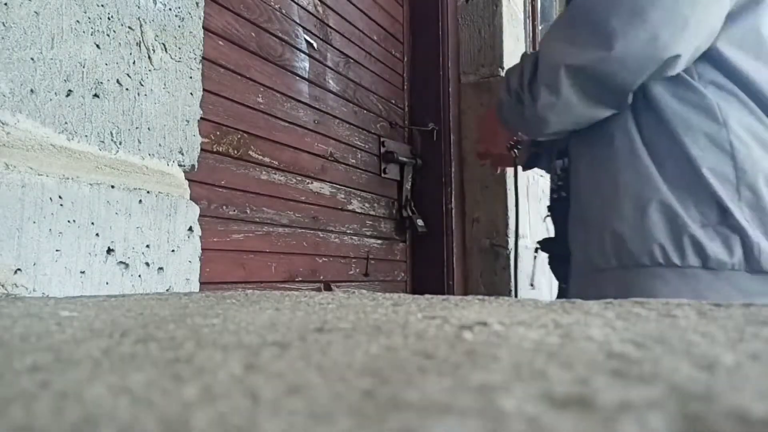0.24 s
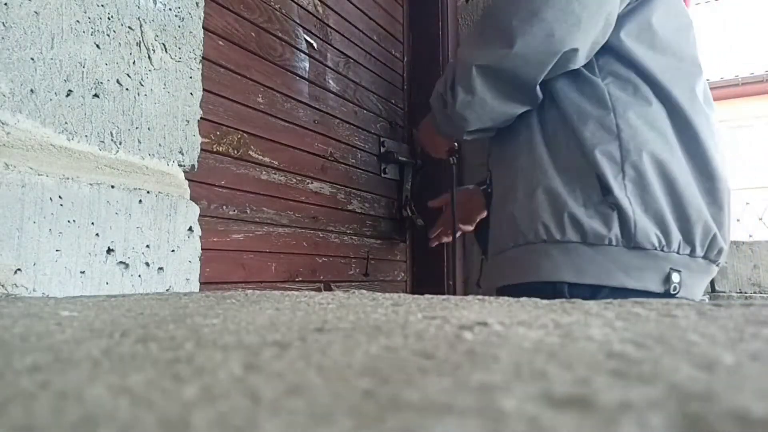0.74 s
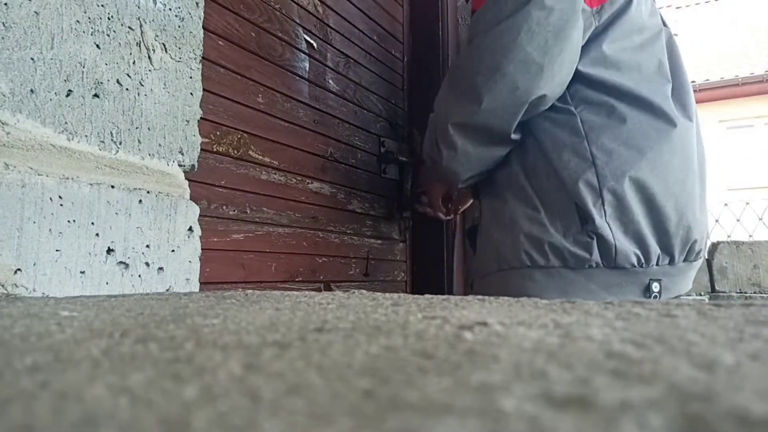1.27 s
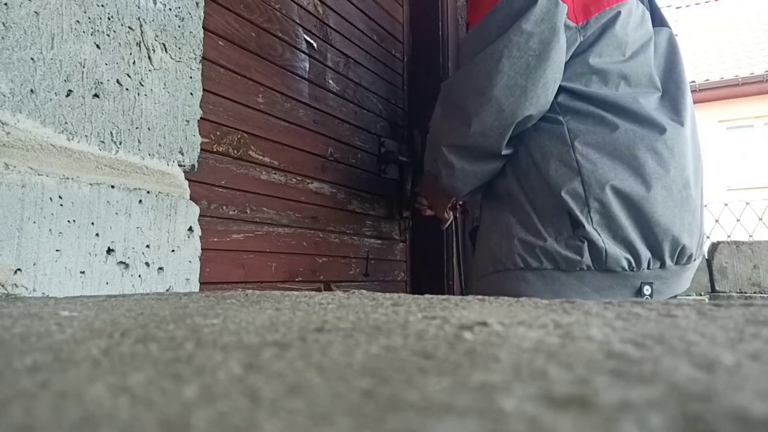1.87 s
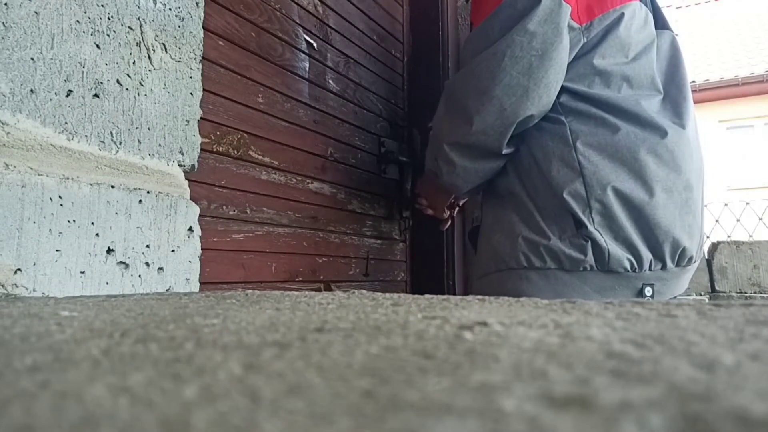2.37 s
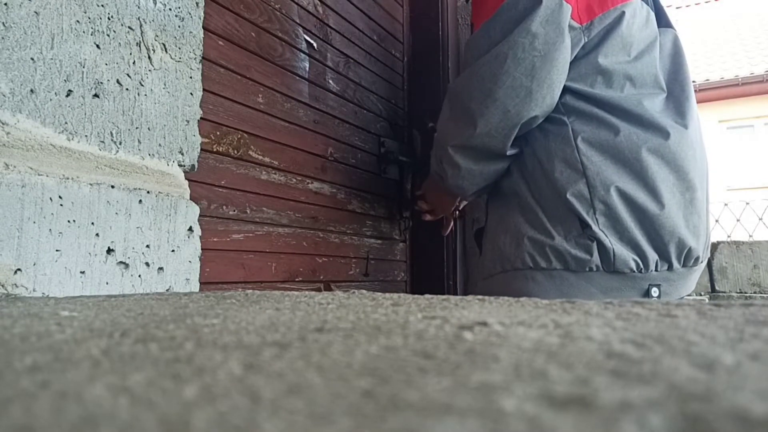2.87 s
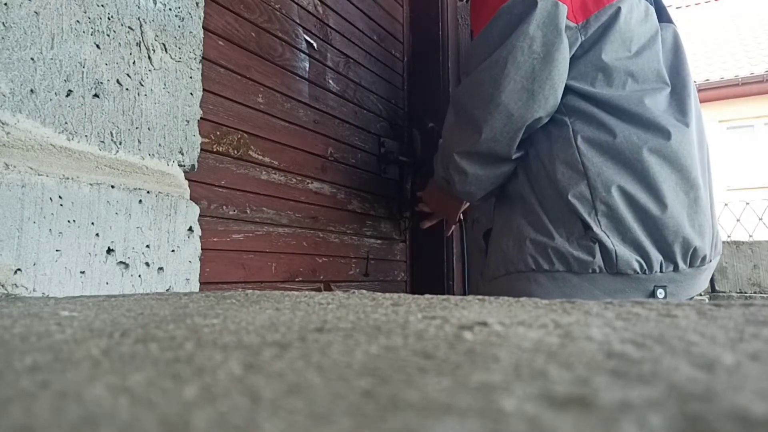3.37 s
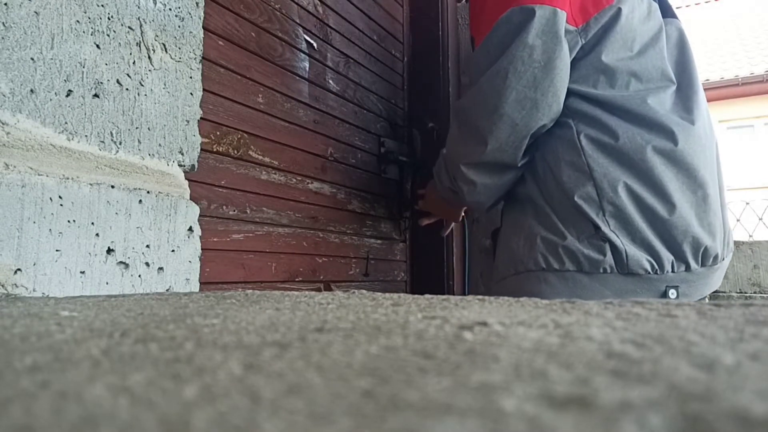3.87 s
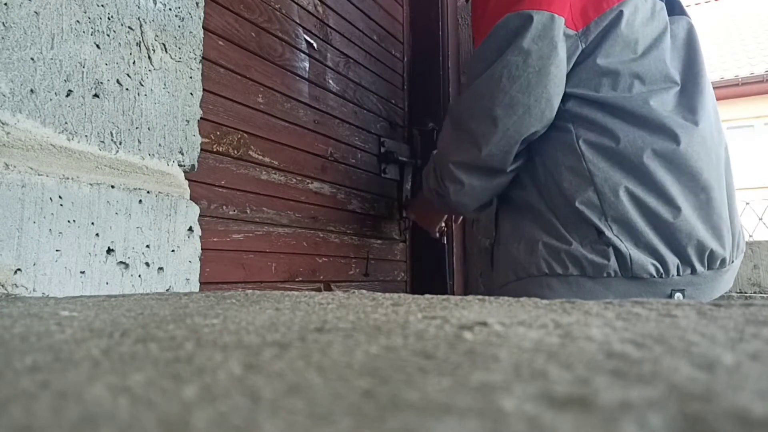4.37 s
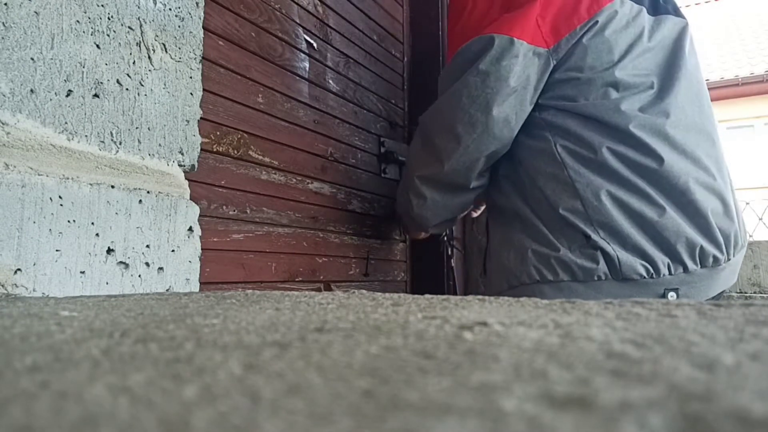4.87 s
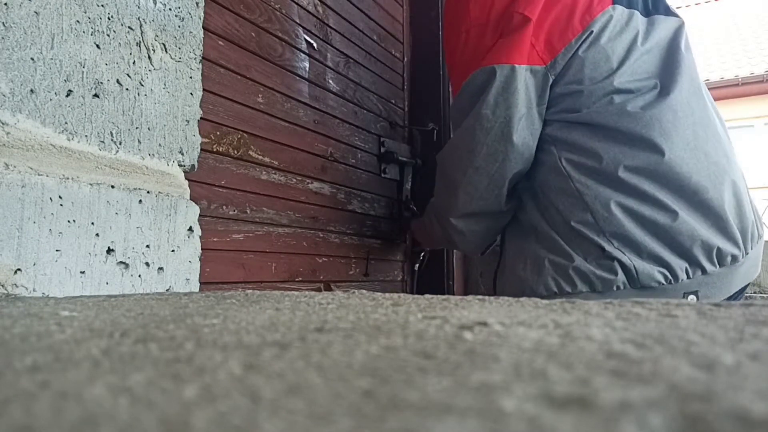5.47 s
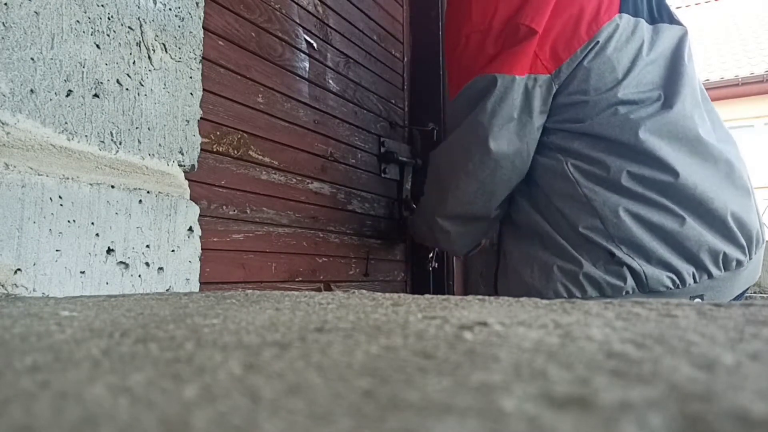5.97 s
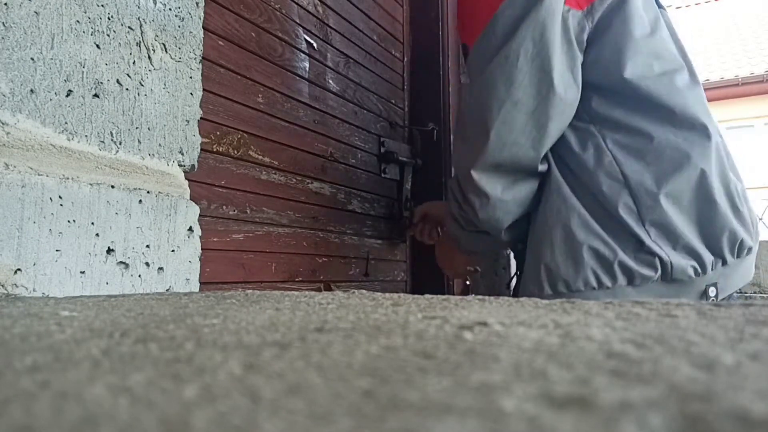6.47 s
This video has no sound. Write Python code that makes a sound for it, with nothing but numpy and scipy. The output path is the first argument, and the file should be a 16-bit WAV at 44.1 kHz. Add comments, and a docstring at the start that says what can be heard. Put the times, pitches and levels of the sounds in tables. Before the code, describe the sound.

An iron latch and chain on an old plank door clank, tick and jingle by hand while small birds chirp outdoors.

```python
"""Outdoors in quiet air, a jacket rustles as small birds chirp and shoes scuff: shaped noise and gliding tones.
Then someone works the iron latch and chain of an old plank door. Struck iron and boards ring as decaying modes,
chain links tick and jingle as short noise bursts and pure notes, and the latch drags by stick-slip friction.
Faint far whistles and hums enter later. Sparse decaying taps give the short echo of the walls and ground."""
import sys
import numpy as np
from scipy import signal
from scipy.fft import rfft, irfft, next_fast_len
from scipy.io import wavfile
from scipy.ndimage import uniform_filter1d

SR = 44100
rng = np.random.default_rng(int(sys.argv[2]) if len(sys.argv) > 2 else 0)


def materialize(psi):
    """Save the field psi as 16-bit PCM at rate SR to the path in sys.argv[1].

    A 1-D psi becomes a single channel; in a 2-D psi each row is a channel.
    """
    bounded = np.clip(np.atleast_2d(psi).T, -1, 1)
    quanta = np.round(bounded * 32767).astype(np.int16)
    wavfile.write(sys.argv[1], SR, quanta)


N = 297234
TIME = np.arange(N) / SR  # the whole scene [s]
AFTER = np.arange(SR * 3 // 4) / SR  # time since one event began [s]


def amp(db):
    """Level law: decibels to amplitude gain."""
    return 10 ** (np.asarray(db) / 20)


def unit(x):
    """Power normalisation: scales to rms 1."""
    return x / np.sqrt(np.mean(x ** 2) + 1e-20)


def unit_peak(x, size=220):
    """Short-time normalisation: the loudest 5 ms get rms 1."""
    return x / np.sqrt(uniform_filter1d(x ** 2, size).max() + 1e-20)


def read(points, hz):
    """Interpolation of a table along a logarithmic frequency axis."""
    f, value = np.transpose(points)
    return np.interp(np.log(hz + 1), np.log(f + 1), value)


def level(rows):
    """Level contour: interpolates (time, dB) rows into a gain for every sample."""
    return amp(np.interp(TIME, *np.transpose(rows)))


def colour(x, spectrum):
    """Spectral shaping: weights the Fourier components by a table, at rms 1."""
    size = next_fast_len(len(x))
    gain = amp(read(spectrum, np.fft.rfftfreq(size, 1 / SR)))
    return unit(irfft(rfft(x, size) * gain, size)[:len(x)])


def band(x, hz, kind, order=3):
    """Causal Butterworth filtering: low-, band- or high-pass."""
    return signal.sosfilt(signal.butter(order, hz, kind, fs=SR, output="sos"), x)


def add(mix, s, sound):
    """Superposition: adds a sound into the mix at time s [s]."""
    part = mix[max(round(s * SR), 0):][:len(sound)]
    part += sound[:len(part)]


def stroke(s, length, attack_s, release_s):
    """Envelope of one movement: linear attack, hold, exponential release."""
    attack = np.clip((TIME - s) / attack_s, 0, 1)
    return attack * np.exp(-np.clip((TIME - s - length) / release_s, 0, 20))


def grains(per_s, spread_db):
    """Granular friction: sparse random impulses, tiny slips of uneven size."""
    size = amp(spread_db * np.minimum(rng.exponential(1, N), 4))
    return unit(rng.standard_normal(N) * size * (rng.random(N) < per_s / SR))


def wobble(size):
    """Smoothed random modulation: a quick waver of rms 1."""
    return unit(uniform_filter1d(rng.standard_normal(len(AFTER)), size=size))


def resonate(x, hz, width):
    """Single resonance of gain 1: shifts hz to zero, smooths with one pole, shifts back."""
    turn = np.exp(2j * np.pi * np.cumsum(hz * np.ones(len(x))) / SR)
    r = np.exp(-np.pi * width / SR)
    return 2 * (turn * signal.lfilter([1 - r], [1, -r], x / turn + 1e-18)).real


def chatter(db, fade_s=0.013, per_s=350):
    """Contact bounce: one unit impulse, then random rebounds that die away exponentially."""
    t = AFTER[:SR // 20]
    hits = rng.standard_normal(len(t)) * (rng.random(len(t)) < per_s / SR)
    rebounds = hits * np.exp(-t / fade_s) * (t > .002)
    return amp(db) * rebounds / (np.linalg.norm(rebounds) + 1e-9) + (t == 0)


# spectrum of the quiet outdoor air: (frequency [Hz], relative density [dB per Hz])
AIR_SPECTRUM = [(15, -48), (25, -1.5), (79, 14.5), (274, -5.5), (389, 3), (895, -1.5), (1200, -5),
                (1660, -1.5), (2230, -22), (6550, -38.5), (8130, -31.5), (11200, -31.5), (15500, -48)]


def air(rms_db=-73):
    """Stationary background: steady Gaussian noise with a fixed spectrum."""
    return amp(rms_db) * colour(rng.standard_normal(N), AIR_SPECTRUM)


# how busily the arms move, heard as jacket swish: (time [s], relative level [dB])
ARM_MOTION = [(0, -56.5), (.24, -57), (.52, -69.5), (.76, -52.5), (.92, -63.5), (1.33, -50.5), (1.56, -72),
              (2.42, -72), (2.6, -66.5), (3.37, -70.5), (3.42, -78), (3.88, -70.5), (4.13, -56),
              (4.82, -48), (5.38, -61), (5.72, -63.5), (6.3, -56), (6.62, -62)]
# hand and cuff brushing the boards: (time [s], length [s], relative rub level [dB], relative swish level [dB])
BOARD_BRUSHES = [(.1, 0.056, -49, -56), (1.14, 0.057, -44.5, -60), (2.62, 0.1, -52.5, -68),
                 (2.85, 0.24, -51, -62), (3.29, 0.069, -50.5, -63.5), (3.65, 0.056, -38, -53),
                 (4.84, 0.048, -45, -60), (4.98, 0.16, -40, -46.5), (5.66, 0.13, -44, -53),
                 (6.0, 0.074, -43, -64), (6.2, 0.14, -63, -52.5)]
BRUSH_ATTACK_S, BRUSH_RELEASE_S = 0.018, 0.039
# one sweep of the sleeve
SWEEP_AT_S, SWEEP_S, SWEEP_DB, SWEEP_ATTACK_S, SWEEP_RELEASE_S = 2.46, 0.1, -46.5, .04, 0.063
# spectra of jacket cloth, of dull rubbing and of the sleeve: (frequency [Hz], relative density [dB per Hz])
CLOTH_SPECTRUM = [(800, 6.5), (2000, -3.5), (3500, 0), (5500, -2.5), (7900, 2), (9500, -6), (11500, -15.5),
                  (14000, -3.5), (15800, 2)]
RUB_SPECTRUM = [(18, -46.5), (30, -17), (59, 10), (114, -1.5), (147, 3.5), (271, -0.5), (321, 4.5),
                (372, -10.5), (509, -2), (579, -9), (697, -4), (1170, -15), (2500, -30), (3250, -53),
                (5500, -120)]
SLEEVE_SPECTRUM = [(60, 3.5), (200, 7.5), (400, 3), (1500, -10), (3000, -3.5), (4600, 3), (6200, -5.5),
                   (9000, -13), (15000, -31)]


def handling(swish_db=5, rub_db=-5, crinkle_db=-9, moving_rub_db=0, resting_rub_db=-66):
    """Granular friction: fine and sparse slips of cloth, and hands and chain rubbing dully on the boards."""
    swishing = level(ARM_MOTION)
    rubbing = amp(moving_rub_db) * swishing + amp(resting_rub_db)
    for s, length, board_db, cloth_db in BOARD_BRUSHES:
        touch = stroke(s, length, BRUSH_ATTACK_S, BRUSH_RELEASE_S)
        rubbing = np.maximum(rubbing, amp(board_db) * touch)
        swishing = np.maximum(swishing, amp(cloth_db) * touch)
    cloth = grains(6300, 0.77) + amp(crinkle_db) * grains(250, 0.67)
    swish = colour(cloth, CLOTH_SPECTRUM) * swishing
    rub = band(colour(grains(1400, 2.6), RUB_SPECTRUM), 58, "highpass", order=2) * rubbing
    sweep = stroke(SWEEP_AT_S, SWEEP_S, SWEEP_ATTACK_S, SWEEP_RELEASE_S)
    sleeve = colour(grains(9000, 1.1), SLEEVE_SPECTRUM) * sweep
    return amp(swish_db) * swish + amp(rub_db) * rub + amp(SWEEP_DB) * sleeve


# spectrum of touching chain links: (frequency [Hz], relative density [dB per Hz])
LINK_SPECTRUM = [(1500, -18), (4000, -10.5), (6000, -13), (7700, 0), (9200, -8), (11500, -8.5),
                 (14000, -10), (15800, -3)]


def jingle(per_s=25, jingle_db=-3, t60=.05):
    """Random impact train: the held chain ticks at chance moments, at a level that follows the arms."""
    tick = colour(rng.standard_normal(len(AFTER)), LINK_SPECTRUM) * amp(-60 * AFTER / t60)
    ticks = unit(signal.fftconvolve(grains(per_s, 1.5), tick)[:N])
    return amp(jingle_db) * level(ARM_MOTION) * ticks


# the pitch moves fast and then levels off, the more so the greater the note's change in level
CHIRP_SAG, SAG_PER_FADE_DB = .6, 0.13
CHIRP_EDGES = 0.3  # share of a note spent fading in and out


def chirp(length, start_hz, end_hz, depth_hz, fade_db, first_buzz,
          buzz_hz=105, full_buzz_hz=480, uneven=.3, rough=0.32):
    """Joint frequency and amplitude modulation: a gliding whistle buzzes, loudest as each beat swings down."""
    u = np.arange(0, 1, 1 / (length * SR))  # progress through the note
    rate = buzz_hz * (1 + uneven * wobble(size=300)[:len(u)])
    beat = 2 * np.pi * (np.cumsum(rate) / SR + rng.random())
    sag = CHIRP_SAG + SAG_PER_FADE_DB * abs(fade_db)
    glide = start_hz + (end_hz - start_hz) * np.expm1(-sag * u) / np.expm1(-sag)
    # the buzz deepens from its first share to its full depth
    depth = depth_hz * (first_buzz + (1 - first_buzz) * np.sin(np.pi * u / 2) ** 2)
    hz = glide + depth * (np.sin(beat) + rough * wobble(size=60)[:len(u)])
    pulsing = 1 - np.minimum(depth / full_buzz_hz, 1) * np.cos(beat)
    strength = signal.windows.tukey(len(u), CHIRP_EDGES) * amp(fade_db * u) * pulsing
    return strength * np.sin(2 * np.pi * np.cumsum(hz) / SR)


# mostly falling chirps: (time [s], length [s], level [dB], start pitch [Hz], end pitch [Hz],
# buzz depth [Hz], level change over the note [dB])
BIRD_CHIRPS = [(0.021, 0.09, -28, 5000, 3030, 284, -23), (0.141, 0.079, -31, 4550, 2870, 403, -12),
               (.35, 0.13, -58, 3440, 3170, 350, -6), (.48, .1, -61, 3340, 3070, 350, -1.5),
               (.6, 0.067, -58.5, 3410, 2850, 350, 0), (0.861, 0.055, -42.5, 4220, 2460, 250, -15),
               (1.056, 0.062, -49.5, 4800, 4160, 350, -6.5), (1.124, 0.053, -45.5, 4160, 3440, 400, -6.5),
               (1.2, .07, -38.5, 4000, 3120, 350, -13), (1.324, .11, -42, 4800, 3270, 380, -9),
               (1.441, .06, -52, 4200, 3090, 350, -10.5), (1.586, 0.083, -57, 3070, 3200, 250, 3),
               (1.666, .04, -46.5, 3450, 3750, 130, -1), (1.704, 0.056, -49, 3700, 3160, 130, -3.5),
               (1.939, 0.074, -54.5, 4650, 4880, 200, -5), (1.991, 0.042, -57, 4780, 3220, 644, -0.5),
               (2.051, 0.089, -50, 4150, 3390, 544, -7.5), (2.146, 0.048, -56, 4900, 3900, 500, -2.5),
               (2.195, .095, -50, 4560, 3150, 446, -6), (2.427, .05, -51.5, 4880, 3280, 450, -3.5),
               (2.495, .035, -49, 3730, 3200, 450, -1), (2.853, 0.052, -47, 4180, 3990, 220, 4.5),
               (2.933, 0.016, -32.5, 4560, 4330, 100, -3.5), (2.945, 0.039, -34.5, 3810, 2836, 220, -16.5),
               (4.472, 0.026, -41, 5830, 4480, 150, -3), (4.553, .1, -42, 5620, 2950, 220, -4.5),
               (4.756, .032, -38.5, 5450, 3500, 150, -4.5)]
# short upward calls: (time [s], level [dB])
UPWARD_CALLS = [(3.145, -60), (3.565, -69.5), (3.827, -59.5), (4.713, -50)]
CALL_S, CALL_FROM_HZ, CALL_TO_HZ, CALL_BUZZ_HZ, CALL_FADE_DB = .042, 3400, 5150, 120, -1
# loud chirps count as near and begin with less buzz; faint ones as far, and buzz fully throughout
NEAR_BIRD_DB, FAR_BIRD_DB = -33, -50
LEAST_FIRST_BUZZ = 0.34  # share of the full buzz depth


def birds(near_scatter=0.28, far_scatter=0.63, scatter_t60=0.057):
    """Direct and diffuse sound: twigs and eaves scatter a share of each chirp, more for distant birds."""
    direct, scattered = np.zeros(N), np.zeros(N)
    for s, length, db, start_hz, end_hz, depth_hz, fade_db in BIRD_CHIRPS:
        far = np.clip((db - NEAR_BIRD_DB) / (FAR_BIRD_DB - NEAR_BIRD_DB), 0, 1)
        first_buzz = max(far, LEAST_FIRST_BUZZ)
        note = amp(db) * chirp(length, start_hz, end_hz, depth_hz, fade_db, first_buzz)
        share = np.clip(near_scatter + (far_scatter - near_scatter) * far, 0, 1)
        add(direct, s, np.sqrt(1 - share ** 2) * note)
        add(scattered, s, share * note)
    for s, db in UPWARD_CALLS:
        add(direct, s, amp(db) * chirp(CALL_S, CALL_FROM_HZ, CALL_TO_HZ, CALL_BUZZ_HZ, CALL_FADE_DB, 1))
    paths = rng.standard_normal(len(AFTER)) * amp(-60 * AFTER / scatter_t60)
    return direct + signal.fftconvolve(scattered, paths / np.linalg.norm(paths))[:N]


# shoe scuffs: (time [s], level [dB], length [s], grit re thump [dB], hollow scrape re thump [dB])
SHOE_SCUFFS = [(0.108, -37.5, 0.064, -8, -37), (0.163, -38, 0.02, -29, -28),
               (0.671, -36.5, 0.047, -4.5, -11.5), (0.686, -29.5, 0.094, -9.5, -8.5),
               (0.737, -30.5, 0.011, -20, -8.5)]
# spectra of the sole's thump and of its hollow scrape: (frequency [Hz], relative density [dB per Hz])
SOLE_SPECTRUM = [(25, -43), (100, -8), (150, -9.5), (230, 0), (310, 7.5), (400, -19.5), (520, -10),
                 (900, -37), (1600, -40.5), (4000, -54)]
SCRAPE_SPECTRUM = [(150, -26), (400, 9), (650, 3), (950, -4), (1400, -5), (2200, -50), (6000, -47)]


def shoes(tail_t60=0.29, grit_t60=0.15, scrape_t60=0.27):
    """Impact and granular friction: a sole thumps on concrete, scrapes and crunches grit."""
    out = np.zeros(N)
    for s, db, length, grit_db, scrape_db in SHOE_SCUFFS:
        rise = np.minimum(AFTER / 0.0035, 1)
        late = np.maximum(AFTER - length / 2, 0)  # the decay begins halfway through
        thump = colour(rng.standard_normal(len(AFTER)), SOLE_SPECTRUM) * amp(-60 * late / tail_t60)
        grit = colour(grains(3000, 1.0)[:len(AFTER)], CLOTH_SPECTRUM) * amp(grit_db - 60 * late / grit_t60)
        scrape = colour(grains(900, 1)[:len(AFTER)], SCRAPE_SPECTRUM)
        scrape = scrape * amp(scrape_db - 60 * late / scrape_t60)
        add(out, s, amp(db) * rise * (thump + grit + scrape))
    return out


# decay time of the door's dense lesser resonances: (frequency [Hz], t60 [s])
DENSE_T60 = [(100, 0.49), (260, 0.18), (700, 0.25), (1840, 0.22), (4850, 0.11), (14000, 0.3)]


def dying(x):
    """Frequency-dependent damping: every band decays at the door's own speed."""
    hz, t, z = signal.stft(x, SR, nperseg=256)
    decay = amp(-60 * t / read(DENSE_T60, hz)[:, None])
    return signal.istft(z * decay, SR, nperseg=256)[1][:len(x)]


# main modes of door and latch: (frequency [Hz], relative level [dB], t60 [s])
DOOR_MODES = [(146, -9, .55), (199, -8, .5), (250, -9, .45), (288, -10, .4), (327, -6, .38), (392, -8, .32),
              (503, -2, .26), (619, -1, .24), (688, 3, .26), (780, -4, .2), (872, -3, .2), (914, -1, .18),
              (1005, -6, .16), (1391, -2, .13), (1506, -2, .13), (1632, 3, .14), (1809, 1, .12),
              (2590, -2, .12), (2920, -2, .1), (3994, -1, .1), (4450, -2, .1), (5067, -1, .12)]
# spectrum of the dense lesser resonances: (frequency [Hz], relative density [dB per Hz])
DENSE_SPECTRUM = [(25, -42), (60, -43), (140, 3.5), (320, -2.5), (650, 4), (950, 3), (1200, -7),
                  (1700, -0.5), (2200, -5), (2900, -1), (4300, 0), (6000, -7), (8000, -8), (10500, -31.5),
                  (15500, -31)]


def door_ring(modes_db=-1, place_db=2):
    """Modal response: a crack, dense resonances, and main modes excited according to the place struck."""
    hz, db, t60 = np.transpose(DOOR_MODES)[:, :, None]
    strength = amp(db + place_db * rng.standard_normal(hz.shape))
    tones = np.sin(2 * np.pi * (hz * AFTER + rng.random(hz.shape)))
    modes = (strength * np.exp(-np.log(1000) * AFTER / t60) * tones).sum(0)
    modes = modes / np.sqrt(np.sum(amp(db) ** 2) / 2)
    dense = dying(colour(rng.standard_normal(len(AFTER)), DENSE_SPECTRUM))
    crack = band(colour(rng.standard_normal(len(AFTER)), DENSE_SPECTRUM), 1200, "highpass")
    crack = crack * amp(8) * np.exp(-AFTER / .007)
    return dense + crack + amp(modes_db) * modes


# latch blows: (time [s], relative level [dB], thud of the boards [dB], clang of the hasp [dB],
# bright crack [dB], favoured note of the iron [Hz], chatter re first contact [dB]);
# thud, clang and crack are relative levels that the trims in latch() shift
LATCH_BLOWS = [(0.979, -16, -7.5, 1, -5, 1430, -38), (1.648, -35.5, -4.5, 2.5, -3, 2280, -10),
               (2.034, -48, -3, -6, -5, 4030, -14), (3.116, -51, 7.5, 6, 0, 1600, -12),
               (3.29, -44, -22, -25, -9, 1370, 5), (3.629, -29.5, -3.5, -1.5, -13, 1890, -3.5),
               (4.006, -15.5, -6, 7, -8.5, 1630, -29), (4.028, -15.5, -37, -2, 6.5, 4070, -31),
               (4.168, -36.5, 6.5, 0.5, -7, 1380, -19), (4.32, -25, -3, -3, -11.5, 1850, -33),
               (4.522, -27.5, -1.5, -3.5, -9, 1330, -27.5), (4.848, -27.5, 2.5, -1, -28, 1750, -7),
               (4.943, -10.5, -17, 3, -3.5, 1670, -5), (4.968, -5.5, -15, -1.5, 1.5, 1640, -25),
               (5.09, -5.5, -17, 1.5, 1, 1750, -27.5), (5.572, -22.5, -27, 3.5, -4.5, 1310, -29),
               (5.637, -21.5, -19, 10, 11.5, 3840, -18), (5.66, -9, -9.5, 4.5, -0.5, 1780, -30),
               (5.749, -23, -9, -1.5, -13, 1810, -10), (5.832, -12, -12.5, -2, -8.5, 2980, -11),
               (5.895, -17.5, -1, -6.5, -14, 1260, -15), (6.006, -11.5, -5.5, 4, -2.5, 1410, -10),
               (6.389, -35.5, -8.5, -4.5, -12, 1220, -32), (6.557, -37, -44, -10, -29, 1650, -21)]


def latch(thud_db=-9, knock_db=-9, clang_db=-9, bright_db=-9, swell_s=0.0025,
          note_db=2, note_width_hz=300, slide_db=-30, slide_s=0.0023):
    """Impact excitation: iron slides, then strikes iron; heavy boards respond a few milliseconds later."""
    out, lead = np.zeros(N), AFTER[:SR // 40]
    for s, db, thud, clang, bright, note_hz, chatter_db in LATCH_BLOWS:
        ring = signal.fftconvolve(door_ring(), chatter(chatter_db))[:len(AFTER)]
        ring = ring + amp(note_db) * resonate(ring, note_hz, note_width_hz)
        boards = band(ring, 400, "lowpass", order=4) * (1 - np.exp(-AFTER / swell_s))
        plank = band(ring, [400, 1150], "bandpass")
        hasp = band(ring, [1150, 2400], "bandpass")
        iron = band(ring, 2400, "highpass")
        parts = [(boards, thud + thud_db), (plank, knock_db),
                 (hasp, clang + clang_db), (iron, bright + bright_db)]
        add(out, s, sum(amp(db + part_db) * unit_peak(part) for part, part_db in parts))
        # the slide swells up to the moment of contact
        slide = colour(rng.standard_normal(len(lead)), DENSE_SPECTRUM) * np.exp(-lead[::-1] / slide_s)
        add(out, s - lead[-1], amp(db + slide_db) * slide)
    return out


def link_notes(t, count=12):
    """Damped modal ringing: a link's few high modes, different at every touch, damped by the hand."""
    hz = rng.uniform(6000, 15800, (count, 1))
    strength = amp(read(LINK_SPECTRUM, hz)) * rng.standard_normal((count, 1))
    return unit((strength * np.sin(2 * np.pi * hz * t)).sum(0)) * amp(-60 * t / .06)


# chain links touching: (time [s], relative level [dB], amplitude share of the top fizz [dB])
LINK_TOUCHES = [(1.0685, -33.5, 0), (1.194, -26.5, -25), (1.2512, -21, 0), (1.2809, -32, -17),
                (1.3242, -29, -2), (1.3719, -24.5, -1), (1.65, -33, -2.5), (2.6783, -41.5, -1.5),
                (2.87, -35, -6), (3.1204, -38.5, -28), (3.292, -38, -1), (3.3227, -29.5, -1.5),
                (3.6494, -29.5, -3.5), (4.334, -29, -1), (4.367, -33.5, -25), (4.714, -37.5, -27),
                (4.753, -31, 2), (4.7878, -27.5, 0), (4.8882, -19, -0.5), (4.9693, -11.5, -1.5),
                (5.33, -38.5, -1.5), (5.465, -33.5, -0.5), (5.56, -34, -1), (5.5957, -32, 0),
                (5.798, -37.5, -1.5), (5.981, -19, -0.5), (6.0047, -13, -6.5), (6.355, -27, 0)]
# links that swing free and ring on: (time [s], note [Hz], level [dB], t60 [s])
FREE_LINKS = [(1.323, 6770, -35.5, 0.088), (1.37, 10030, -33.5, 0.083), (3.651, 9540, -51, 0.35),
              (4.259, 6970, -40, 0.039), (4.334, 10030, -35.5, 0.1), (4.366, 15600, -35, .06),
              (4.372, 13900, -34.5, 0.099), (4.754, 13700, -36, 0.15), (4.799, 12522, -32, 0.32),
              (4.796, 7230, -46, 0.85), (4.797, 7880, -45, 0.73), (4.798, 13910, -37.5, 0.36)]


def chain(tick_s=0.00044, tail_db=-12, tail_t60=0.24, clink_db=-8, fizz_db=0, notes_db=-8, rebound_db=-9):
    """Damped and free vibration: held links tick and jingle briefly, free links ring with thin pure notes."""
    out, t = np.zeros(N), AFTER[:SR // 3]
    for s, db, fizz in LINK_TOUCHES:
        decay = np.exp(-t / tick_s) + amp(tail_db - 60 * t / tail_t60)
        tick = colour(rng.standard_normal(len(t)), LINK_SPECTRUM) * decay
        tick = signal.fftconvolve(tick + amp(notes_db) * link_notes(t), chatter(rebound_db))
        share = np.clip(amp(fizz + fizz_db), .05, .97)
        low = unit_peak(band(tick, 9500, "lowpass", order=6))
        high = unit_peak(band(tick, 12000, "highpass"))
        add(out, s, amp(db + clink_db) * (np.sqrt(1 - share ** 2) * low + share * high))
    for s, hz, db, t60 in FREE_LINKS:
        add(out, s, amp(db - 60 * AFTER / t60) * np.sin(2 * np.pi * hz * AFTER))
    return out


# latch dragging on the boards: (time [s], length [s], final level [dB], judder pitch [Hz],
# judder re plain scraping [dB])
DRAG_STROKES = [(1.165, 0.042, -37, 327, 2.5), (3.928, 0.076, -35, 304, -4.5),
                (4.921, 0.039, -24.5, 1662, -10), (5.42, 0.082, -34, 302, 3), (5.529, 0.12, -31, 686, -14),
                (5.669, 0.0088, -28.5, 680, 4.5), (5.926, 0.0626, -20, 682, -3.5),
                (6.031, 0.022, -50, 300, 15), (6.718, 0.017, -36.5, 346, -5)]
# spectrum of the slips: (frequency [Hz], relative level [dB])
SLIP_SPECTRUM = [(100, 10), (300, 11), (700, 4.5), (1200, 1.5), (3000, -13.5), (9000, -17)]
# each stroke grows as the hand presses harder, then lets go
PRESS_DB, DRAG_ATTACK_S, DRAG_RELEASE_S = 11, .006, 0.024


def drag(slips_per_s=500, judder_width_hz=90):
    """Stick-slip friction: slipping iron shakes the door and judders, louder as each stroke presses on."""
    slips, ring = colour(grains(slips_per_s, 2.6), SLIP_SPECTRUM), door_ring()
    pressure, judders = np.zeros(N), np.zeros(N)
    for s, length, db, hz, judder_db in DRAG_STROKES:
        press = amp(db - PRESS_DB * np.clip(1 - (TIME - s) / length, 0, 1))
        force = press * stroke(s, length, DRAG_ATTACK_S, DRAG_RELEASE_S)
        felt = force[round(s * SR):][:len(AFTER)]
        judder = resonate(rng.standard_normal(len(AFTER)), hz, judder_width_hz)
        judder = unit(resonate(judder, hz, judder_width_hz))
        add(judders, s, amp(judder_db) * felt * judder[-len(felt):])
        pressure += force
    steady_rms = np.std(signal.fftconvolve(slips, ring)[:N])
    return signal.fftconvolve(slips * pressure, ring)[:N] / steady_rms + judders


# faint far whistles and hums: (time [s], length [s], pitch [Hz], level [dB])
FAR_NOTES = [(2.073, .05, 7300, -66), (2.196, .04, 7550, -66), (2.25, 0.14, 2114, -74),
             (2.282, 0.031, 7300, -69), (2.392, .05, 7450, -67), (2.92, 0.14, 544, -56.5),
             (3.0, 0.47, 533, -64)]


def far_tones(waver=0.023):
    """Random frequency modulation: soft, slightly unsteady sine notes from far off."""
    out = np.zeros(N)
    for s, length, hz, db in FAR_NOTES:
        pitch = hz * (1 + waver * wobble(size=150)[:int(length * SR)])
        fade = signal.windows.tukey(len(pitch), .6)
        add(out, s, amp(db) * fade * np.sin(2 * np.pi * np.cumsum(pitch) / SR))
    return out


def yard(x, wet_db, t60):
    """Diffuse reflection: sparse, decaying random echoes from the walls and the ground."""
    sparse = rng.standard_normal(len(AFTER)) * (rng.random(len(AFTER)) < 2000 / SR)
    taps = sparse * (AFTER > .004) * amp(-60 * AFTER / t60)
    return x + amp(wet_db) * signal.fftconvolve(x, taps / np.linalg.norm(taps))[:N]


def scene():
    """Superposition: person, door and chain close by, birds and far tones with more echo, in quiet air."""
    near = handling() + jingle() + shoes() + latch() + chain() + drag()
    far = birds() + far_tones()
    return (air() + yard(near, wet_db=-19.5, t60=0.29) + yard(far, wet_db=-10, t60=.26))[None]


def record(dry, low_cut_hz=45, edge_hz=16050):
    """Band limitation: the microphone's low cut, then a steep linear-phase low-pass."""
    thinned = band(dry, low_cut_hz, "highpass", order=2)
    low_pass = signal.firwin(511, edge_hz, window=("kaiser", 9), fs=SR)
    return signal.oaconvolve(thinned, low_pass[None], "same")


dry = scene()
out = record(dry)
materialize(out)
```